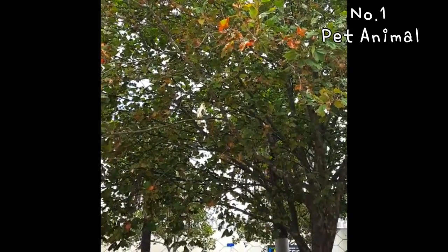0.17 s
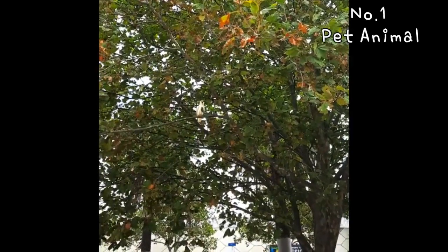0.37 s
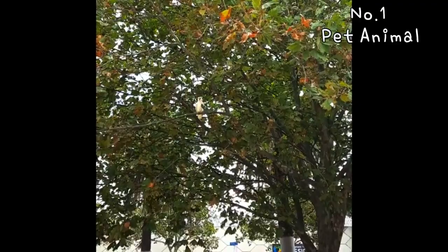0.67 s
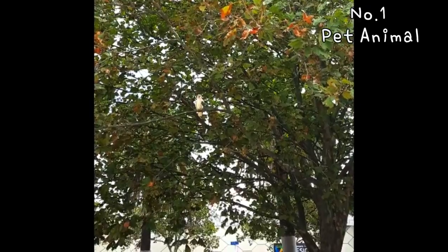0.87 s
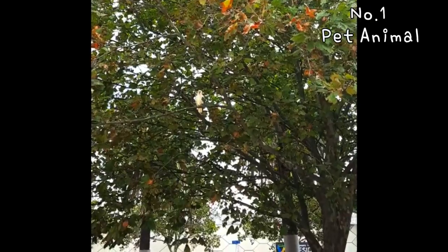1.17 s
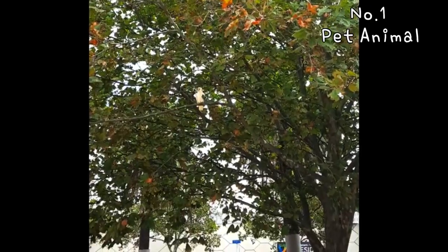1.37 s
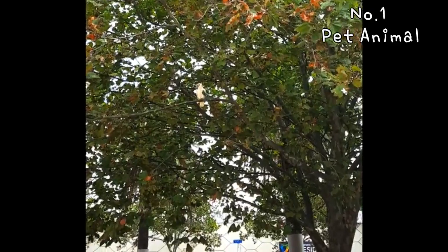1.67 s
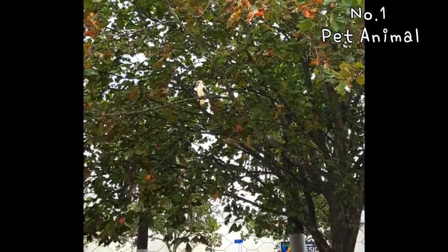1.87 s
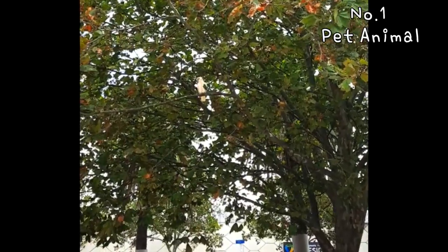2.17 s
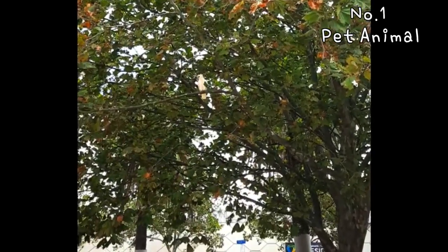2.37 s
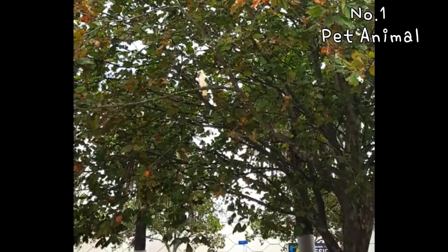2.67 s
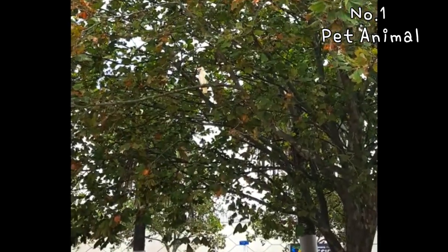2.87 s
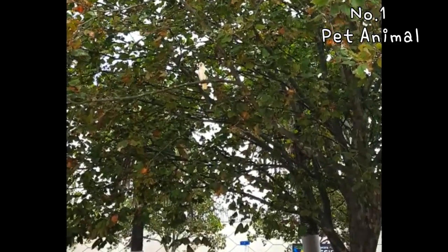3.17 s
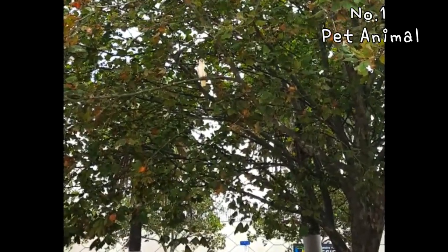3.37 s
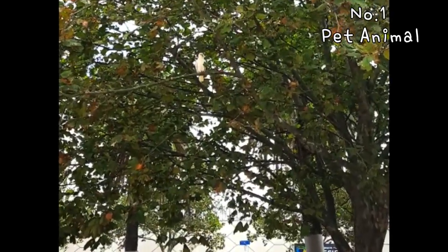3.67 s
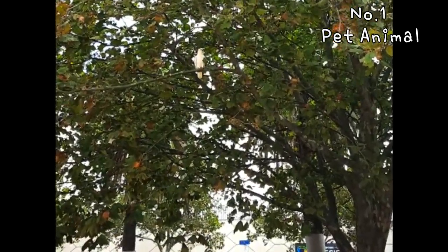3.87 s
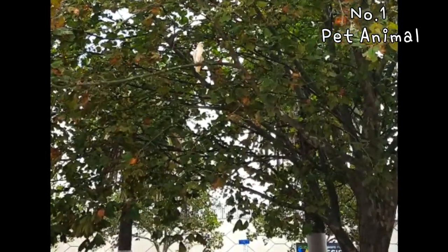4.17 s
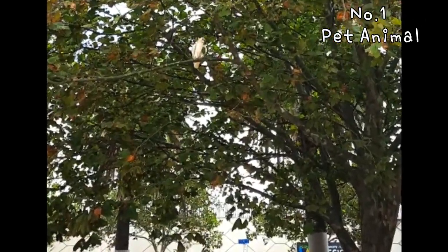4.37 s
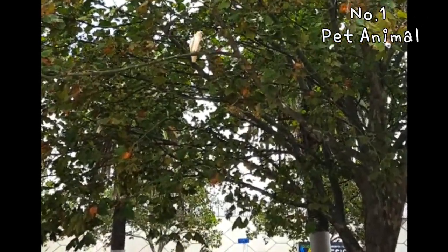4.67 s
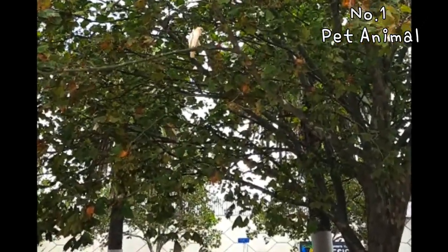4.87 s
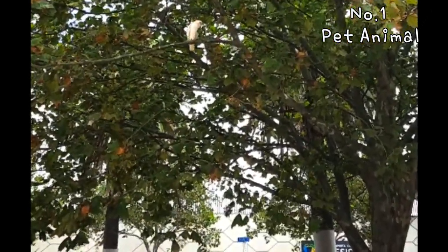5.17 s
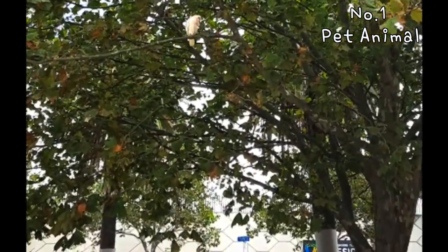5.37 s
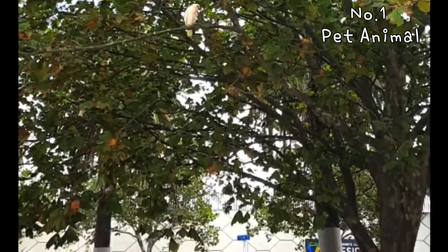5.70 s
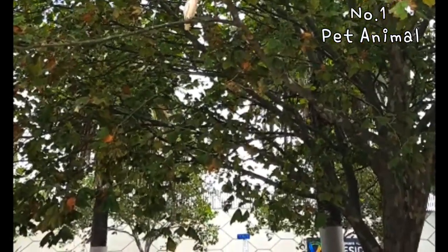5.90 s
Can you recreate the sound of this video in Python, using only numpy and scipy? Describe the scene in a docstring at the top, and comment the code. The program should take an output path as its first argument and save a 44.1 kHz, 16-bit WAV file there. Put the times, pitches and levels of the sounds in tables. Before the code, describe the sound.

The sound opens already inside a cockatoo's screech, lasting until about 0.6 s: loud, nasal and piercing, around 650 to 750 Hz with bright harmonics, roughening into a torn rasp in the middle and at its end. A short diffuse echo fades through the trees. Low, lumpy rumble continues throughout, heavier on the left, with dull soft bumps on the hand-held microphone, clustered in the first second and scattered until 4.8 s. Behind it lie a distant traffic wash and thin leaf hiss, with slight rustles near 1.9 and 3 s. From about 2.5 s a far engine drones faintly, rising in pitch. At 3.7 s the second screech begins with a brief high rough squeak, drops to a clearer note and fades, ending raspy at 4.3 s. A very faint brake squeal enters after 5.1 s; at 5.4 and 5.55 s a distant bird gives two short falling whistles.

```python
"""A cockatoo screeches twice in a park, each call breaking between a clear pitched tone and a chaotic rasp.
Pulses excite the throat resonances, and torn air supplies the rasp; leaves scatter the calls and a far wall
returns them. A distant bird whistles twice in gliding sines, and faint narrow rustles are bursts of noise.
An engine pulls away in three harmonics and a brake sings as one faint sine. Bumps on the hand-held
microphone are damped sines; rumble, traffic wash and leaf hiss are shaped noise."""
import sys
import numpy as np
from scipy import signal
from scipy.fft import rfft, irfft, next_fast_len
from scipy.io import wavfile
from scipy.ndimage import uniform_filter1d

SR = 44100
rng = np.random.default_rng(int(sys.argv[2]) if len(sys.argv) > 2 else 0)


def to_wav(s):
    """Save 16-bit WAV."""
    ch = np.atleast_2d(s).T  # columns
    pcm = np.round(np.clip(ch, -1, 1) * 32767)  # PCM
    wavfile.write(sys.argv[1], SR, pcm.astype(np.int16))


N = 266187
TIME = np.arange(N) / SR
PADDED = next_fast_len(N + 2 * SR, True)
FREQS = np.maximum(np.fft.rfftfreq(PADDED, 1 / SR), 1)

# The two screeches. Each row: start in seconds, end in seconds, level in dB before the band trims,
# hold in seconds, fade in dB per second, offset of the low partials in dB, offset of the treble in dB.
SCREECHES = [(-0.09, 0.569, -26.5, .17, 21, -1.5, -3), (3.671, 4.341, -27, 0.071, 14.5, -1, -4.5)]
ATTACK_S, RELEASE_S, RELEASE_DB = 0.13, 0.013, 7
# Pitch of each screech before droop and jitter. Each row: time in seconds, pitch in Hz.
SCREECH_PITCH = [
    [(0, 653.4), (.022, 668), (.036, 721.5), (.06, 755), (.2, 744), (.3, 715), (.338, 673.4), (.41, 641.3),
     (.47, 639.1), (.535, 650)],
    [(3.765, 634.2), (3.795, 636.8), (3.838, 697.5), (3.885, 687.9), (3.925, 711), (3.968, 701.6),
     (3.981, 663.6), (4.03, 653.2), (4.09, 637.7), (4.295, 630.8), (4.318, 658.3)],
]
# The pitch sags as each screech runs out.
DROOP_S, DROOP_HZ = 0.028, 68.4
# The second screech scoops up into a high register before it drops into its note.
SQUEAK_END_S, SQUEAK_HZ, SCOOP_S, SCOOP_HZ = 3.761, 1108, 0.035, 173
# The squeak leaves through a half-shut beak.
SQUEAK_RING_DB, SQUEAK_TREBLE_DB, BEAK_OPENS_S = -5, -10, 0.049
# The voice breaks into a rasp. Each row: start in seconds, end in seconds, roughness from 0 to 1.
VOICE_BREAKS = [(0.019, 0.038, .38), (0.102, 0.313, .75), (0.488, 0.58, .88), (3.657, 3.766, 0.9),
                (3.922, 3.947, .68), (3.959, 3.975, .58), (4.298, 4.321, .3), (4.321, 4.353, .88)]
# Between breaks the tone clears as the effort fades.
BREAK_EDGE_S, CLEAR_ROUGHNESS, ROUGHNESS_PER_DB = 0.0081, 0.19, 1.35
# Roughness 1 would move this much level out of the low partials and into the treble.
RASP_LOW_DB, RASP_TREBLE_DB = -0.5, 3
# Low, middle and treble bands each flare when a harmonic meets their resonance.
# Each row: centre in Hz, width in Hz, greatest lift in dB.
BAND_FLARES = [(2315, 248, 8), (3394, 190, 4), (6660, 96, 3.5)]
# The highest treble drops away as the second screech settles on its low note.
DULLS_AT_S, DULLS_OVER_S, DULLS_DB = 3.95, 0.07, -6.5
# Resonances of throat and open beak. Each row: centre in Hz, width of one pass in Hz, relative peak in dB.
THROAT_RESONANCES = [(763, 110, -18.5), (1251.6, 170, -6), (1423, 100, -4.5), (1780, 71, -11.5),
                     (2278, 475, 1.5), (2598, 180, -8), (3424, 160, -0.5), (4410, 210, -2.5),
                     (5080, 450, -6.5), (5980, 400, -9), (6450, 600, -4), (8330, 210, -19.5),
                     (10546, 1000, -25), (14000, 3500, -33)]
# An anti-resonance of the windpipe. The row: centre in Hz, width in Hz, depth in dB.
WINDPIPE_DIP = (3930, 270, -15)
SPREAD_S_PER_HZ = 2e-7
# Spectrum of the air torn by the syrinx. Each row: frequency in Hz, relative level in dB.
RASP_SPECTRUM = [(350, -63.5), (600, -39.5), (734, -26), (887, -26), (1350, -21), (1460, -22), (1910, -16),
                 (2220, -13.5), (2570, -16.5), (4970, -10.5), (5610, -20), (6510, -12), (9240, -40),
                 (10700, -28), (15000, -37)]
# Direction of the bird. Each row: frequency in Hz, left minus right level in dB.
BIRD_SIDE = [(700, 1), (2300, 0), (3400, -2.5), (4500, -4), (6500, -10), (8300, -8), (10500, 7),
             (15000, -14.5)]
# Distant whistles, one list a note. Each row: time in seconds, pitch in Hz before jitter, relative level in dB.
WHISTLES = [
    [(5.415, 1693, -73.5), (5.44, 1634, -50.5), (5.465, 1492, -59), (5.5, 1496, -55)],
    [(5.545, 1530, -60.5), (5.572, 1504, -46.5), (5.59, 1390, -59), (5.607, 1180, -56)],
]
# Faint narrow rustles. Each row: centre time in seconds, half length in seconds, centre in Hz, level in dB.
NARROW_RUSTLES = [(0.968, 0.034, 6370, -68.5), (2.96, .03, 3500, -65), (5.612, 0.05, 4200, -69),
                  (5.91, .06, 3850, -67.5)]
# Firing rate of the far engine before jitter. Each row: time in seconds, rate in Hz.
ENGINE_RATE = [(2.3, 71), (3.05, 74.1), (3.85, 79.94), (4.85, 88.06), (6.04, 87.07)]
# Its drone swells and sinks. Each row: centre time in seconds, half length in seconds, relative level in dB.
ENGINE_SWELLS = [(2.52, 0.091, -35), (3.02, 0.16, -37.5), (3.9, 0.22, -35.5), (4.77, 0.28, -36),
                 (5.87, .22, -39)]
BRAKE_HZ = 2000
# Level of the brake before its flutter. Each row: time in seconds, level in dB.
BRAKE_LEVEL = [(5.08, -93), (5.22, -68), (5.42, -68.5), (5.56, -70.5), (5.68, -72)]
# Bumps on the microphone. Each row: start in seconds, relative level in dB, pitch of the body in Hz,
# relative level in dB of the shudder it adds to the rumble.
MICROPHONE_BUMPS = [(0.087, -17, 108, -55), (0.115, -12, 77.4, -48), (0.165, -17, 110, -52),
                    (0.312, -15, 107, -45), (0.589, -22, 116, -39), (0.698, -21.5, 125, -46),
                    (0.736, -22, 119, -35), (0.893, -24.5, 123, -42), (1.832, -16.5, 84, -53),
                    (2.108, -24.5, 130, -50), (2.442, -21.5, 75, -43), (2.511, -23.5, 135, -43),
                    (2.647, -26, 140, -47.5), (2.946, -29, 85, -37), (3.102, -24.5, 73.5, -45.5),
                    (3.526, -15.5, 138.1, -39), (3.814, -17.5, 102, -48), (4.614, -19.5, 94, -37.5),
                    (4.659, -25.5, 79, -40), (4.825, -19, 89.2, -47.5)]
# Each bump stirs up the rumble for a moment.
SHUDDER_LAG_S, SHUDDER_S = 0.012, 0.021
# Spectrum of the rumble. Each row: frequency in Hz, relative level in dB.
RUMBLE_SPECTRUM = [(15, -49), (25, -23), (59, -5.5), (75, 0.5), (103, -6), (124, -5), (203, -16.5),
                   (227, -19), (254, -22.5), (299, -15.5), (500, -36.5), (650, -67), (1100, -120)]
# Course of the rumble. Each row: time in seconds, relative level in dB.
RUMBLE_LEVEL = [(0, -43.5), (1.3, -45.5), (2.3, -44), (3.3, -44.5), (4.7, -44.5), (5.3, -48.5),
                (6.04, -44.5)]
# Spectrum of the traffic wash. Each row: frequency in Hz, relative level in dB.
TRAFFIC_SPECTRUM = [(250, -6), (450, -4.5), (700, -4.5), (1000, -9), (1500, -16), (2200, -21.5),
                    (3500, -28.5), (7000, -42)]
# Course of the traffic wash. Each row: time in seconds, level in dB before panning.
TRAFFIC_LEVEL = [(0, -53.5), (1.2, -59), (2, -55.5), (3, -55), (4.5, -55), (6.04, -53.5)]
# Spectrum of the leaf hiss. Each row: frequency in Hz, relative level in dB.
LEAF_SPECTRUM = [(1500, 0), (3000, -2.5), (4500, 0.5), (6000, 4), (8000, -1), (9500, -14.5), (12000, -10),
                 (15000, -9)]
# Course of the leaf hiss. Each row: time in seconds, level in dB before panning.
LEAF_LEVEL = [(0, -74), (1.35, -73.5), (2.0, -69.5), (2.9, -68), (4.85, -70), (5.3, -71.5), (5.65, -67.5)]
# Brief rustles. Each row: centre time in seconds, half length in seconds, level in dB before panning.
LEAF_RUSTLES = [(1.87, .04, -67), (2.98, 0.055, -66)]
CUTOFF_HZ = 15350


def cockatoo(low_db=-0.5, mid_db=-1.5, high_db=0.0, sizzle_db=2.0):
    """Radiation from the beak: effort sets the level of three bands, each with its own course."""
    pitch, rough, low_course_db, ring_course_db, treble_course_db = gestures()
    voice = through_crown(syrinx(pitch, rough))
    side = panned(curve_db(BIRD_SIDE))
    over_low, over_mid, over_top = above(2420), above(3900), above(8500)
    body = evened(filtered(voice, side * (1 - over_low))) * from_db(low_course_db + low_db)
    ring = evened(filtered(voice, side * (over_low - over_mid))) * from_db(ring_course_db + mid_db)
    treble = evened(filtered(voice, side * over_mid)) * from_db(treble_course_db + high_db)
    # the highest treble is lifted, then dulled within the second screech
    sizzle_gain = from_db(sizzle_db + DULLS_DB * ramp(DULLS_AT_S, DULLS_OVER_S))
    treble = treble + filtered(treble, over_top) * (sizzle_gain - 1)
    gate = sum(sounding([[start], [end]]) for start, end, *_ in SCREECHES)
    return (body + ring + treble) * gate


def gestures():
    """Vocal effort: each screech swells, holds and fades; gives pitch, roughness and three band levels in dB."""
    half_edge = BREAK_EDGE_S / 2
    broken = 0
    for start, end, rough in VOICE_BREAKS:
        broken = broken + rough * (ramp(start - half_edge, BREAK_EDGE_S) - ramp(end - half_edge, BREAK_EDGE_S))
    calls = []
    for (start, end, db, hold, fade, low_db, treble_db), tune in zip(SCREECHES, SCREECH_PITCH):
        attack_db = 20 * np.log10(ramp(start, ATTACK_S) + 1e-4)
        faded_db = fade * np.maximum(TIME - start - ATTACK_S - hold, 0)
        effort_db = db + attack_db - faded_db - RELEASE_DB * ramp(end - RELEASE_S, RELEASE_S)
        pitch = in_time(tune)[0] - DROOP_HZ * ramp(end - DROOP_S, DROOP_S)
        rough = np.clip(np.maximum(broken, CLEAR_ROUGHNESS - ROUGHNESS_PER_DB * faded_db), 0, 1)
        calls.append([pitch, rough, effort_db + low_db, effort_db, effort_db + treble_db])
    second_start = SCREECHES[1][0]
    in_second = TIME > second_start - 1
    pitch, rough, low, ring, treble = np.where(in_second, calls[1], calls[0])
    squeak = SQUEAK_HZ - SCOOP_HZ * (1 - ramp(second_start, SCOOP_S))
    pitch = np.where(in_second & (TIME < SQUEAK_END_S), squeak, pitch)
    shut = in_second * (1 - ramp(SQUEAK_END_S, BEAK_OPENS_S))
    flares = []
    for hz, width, db in BAND_FLARES:
        nearest_harmonic = np.round(hz / pitch) * pitch
        flares.append(db * np.exp(-((nearest_harmonic - hz) / width) ** 2))
    low_flare, ring_flare, treble_flare = flares
    # a rasp smears the upper harmonics, so the upper flares shrink as roughness grows
    clear = 1 - rough
    low = low + low_flare + RASP_LOW_DB * rough
    ring = ring + ring_flare * clear + SQUEAK_RING_DB * shut
    treble = treble + treble_flare * clear + RASP_TREBLE_DB * rough + SQUEAK_TREBLE_DB * shut
    return pitch, rough, low, ring, treble


def syrinx(pitch, rough, slip=0.047, waver=0.0013, shimmer_db=-0.5, doubling=0.6, rasp_db=0.0, burst_db=4.5):
    """Source and filter: pulses ring the throat; roughness makes cycles slip and sputter and tears the air."""
    chaos = rough * np.sqrt(rough)
    phase = np.cumsum(pitch * (1 + waver * drift(90) + 0.012 * chaos * drift(160))) / SR
    # uneven cycle timing smears the high harmonics first
    phase = phase + slip * chaos * drift(650)
    # in fits, strong and weak cycles alternate
    alternation = 1 + doubling * chaos * drift(60) * np.cos(np.pi * phase)
    strength = from_db(shimmer_db * chaos * drift(500)) * alternation
    tone = evened(filtered(pulses(phase) * strength, throat_response())[None])[0]
    # the tone weakens and sputters, and air escapes in puffs once a cycle
    tone = tone * np.sqrt(1 - 0.85 * chaos ** 2)
    tone = tone * from_db(burst_db * chaos * drift(220))
    puffs = rng.standard_normal(N) * (1 + 0.5 * np.cos(2 * np.pi * phase)) * from_db(2 * drift(180))
    torn_air = rms_one(filtered(puffs, from_db(curve_db(RASP_SPECTRUM))))
    return tone + from_db(rasp_db) * chaos * torn_air


def pulses(phase, count=27):
    """Fourier synthesis: equal harmonics add up to one sharp pulse a cycle."""
    half = np.pi * (phase % 1) + 1e-9
    return rms_one(np.sin((2 * count + 1) * half) / np.sin(half) - 1)


def throat_response():
    """Resonance and dispersion: throat and beak form peaks, the windpipe a dip and a spread in time."""
    # each resonance acts twice, which keeps the valleys between them dark
    peaks = sum(from_db(db) / (1 + 2j * (FREQS - hz) / width) ** 2 for hz, width, db in THROAT_RESONANCES)
    dip_hz, dip_width, dip_db = WINDPIPE_DIP
    dip = from_db(dip_db * np.exp(-(2 * (FREQS - dip_hz) / dip_width) ** 2))
    # higher harmonics leave a little later
    spread = np.exp(-1j * np.pi * FREQS ** 2 * SPREAD_S_PER_HZ)
    return peaks * dip * spread


def through_crown(voice, branches_db=-1.5, flutter_db=-12.5, left_lag_ms=0.07):
    """Scattering: direct sound, quick reflections from branches, and shifting ones from swaying leaves."""
    branches, leaves = scatter(0.02, 0.0005), scatter(0.02, 0.0005)
    still = filtered(voice, left_late(left_lag_ms) + from_db(branches_db) * branches)
    return still + from_db(flutter_db) * drift(14) * filtered(voice, leaves)


def park_echoes(x, trees_db=-8.0, trees_t60=0.4, tail_db=-23.0, tail_t60=1.294,
                wall_s=0.25, wall_db=-31.0, dull_hz=4300):
    """Reverberation: other trees, a long thin tail and a far wall return sound dulled by air and foliage."""
    trees = from_db(trees_db) * scatter(trees_t60, 0.018)
    tail = from_db(tail_db) * scatter(tail_t60, 0.05)
    wall = from_db(wall_db) * np.exp(-2j * np.pi * FREQS * wall_s)
    return filtered(x, (trees + tail + wall) / np.sqrt(1 + (FREQS / dull_hz) ** 4))


def scatter(t60, first_s):
    """Diffuse reflection: response of random, dying arrivals, different in each channel; unit energy."""
    burst = rng.standard_normal((2, N)) * from_db(-60 * np.minimum(TIME / t60, 4)) * (TIME > first_s)
    return rfft(burst / np.sqrt(np.sum(burst ** 2, axis=1, keepdims=True)), PADDED)


def far_bird(octave_db=-10.5):
    """Gliding tones: two whistles fall in pitch, each a sine with its octave."""
    out = 0
    for note in WHISTLES:
        pitch, level_db = in_time(note)
        phase = 2 * np.pi * np.cumsum(pitch * (1 + 0.00644 * drift(200))) / SR
        tone = np.sin(phase) + from_db(octave_db) * np.sin(2 * phase)
        out = out + tone * from_db(level_db) * sounding(note)
    return np.sqrt(2) * out


def narrow_rustles(width_hz=600):
    """Band-limited noise: short soft bursts of narrow-band noise."""
    out = 0
    for s, length, hz, db in NARROW_RUSTLES:
        band = np.exp(-(2 * (FREQS - hz) / width_hz) ** 2)
        noise = rms_one(filtered(rng.standard_normal((2, N)), band))
        out = out + noise * from_db(db) * np.exp(-((TIME - s) / length) ** 2)
    return out


def engine(second_db=-16.5, third_db=-20.5):
    """Periodic exhaust: the firing rate and two overtones climb as a vehicle gathers speed, then level off."""
    rate, = in_time(ENGINE_RATE)
    phase = 2 * np.pi * np.cumsum(rate * (1 + 0.0081 * drift(15))) / SR
    note = np.sin(phase) + from_db(second_db) * np.sin(2 * phase) + from_db(third_db) * np.sin(3 * phase)
    throb = from_db(1.2 * drift(12))
    return np.sqrt(2 * swells(ENGINE_SWELLS)) * note * throb * panned(1.4)


def brake():
    """A single partial: a thin squeal from the street, slightly unsteady in pitch and level."""
    phase = 2 * np.pi * np.cumsum(BRAKE_HZ * (1 + 0.00202 * drift(60))) / SR
    level = from_db(in_time(BRAKE_LEVEL)[0] + 1.9 * drift(25))
    return np.sqrt(2) * np.sin(phase) * level * sounding(BRAKE_LEVEL)


def bumps(t60=0.028, gain_db=0.5, rise_s=0.0043):
    """Damped oscillation: each bump is a few dull, quickly dying cycles, mostly on the left."""
    out = np.zeros(N)
    for s, db, hz, _ in MICROPHONE_BUMPS:
        age = np.clip(TIME - s, 0, 1)
        decay = from_db(db + gain_db - 60 * age / t60)
        out += decay * 2 * (1 - np.exp(-age / rise_s)) * np.sin(2 * np.pi * hz * age)
    return out * np.array([[1.85], [0.15]])


def background(rumble_db=4.5, lump_db=2.0):
    """Shaped noise: lumpy low rumble, the wash of far tyres and a faint hiss of leaves."""
    shudders = swells([(s + SHUDDER_LAG_S, SHUDDER_S, db) for s, _, _, db in MICROPHONE_BUMPS])
    heave = np.sqrt(from_db(in_time(RUMBLE_LEVEL)[0]) ** 2 + shudders)
    rumble = stereo_noise(RUMBLE_SPECTRUM, likeness=0.79, left_db=6.0) * heave
    rumble = rumble * from_db(rumble_db + lump_db * drift(25))
    tyres = stereo_noise(TRAFFIC_SPECTRUM, likeness=0.45, left_db=1.5) * from_db(in_time(TRAFFIC_LEVEL)[0])
    leaf_gain = np.sqrt(from_db(in_time(LEAF_LEVEL)[0]) ** 2 + swells(LEAF_RUSTLES))
    leaves = stereo_noise(LEAF_SPECTRUM, likeness=0.0, left_db=-5.0) * leaf_gain
    return rumble + tyres + leaves


def stereo_noise(spectrum, likeness, left_db, left_lag_ms=0.14):
    """Partial coherence: coloured noise shared in part by both channels, its left side delayed."""
    mid, side = rng.standard_normal((2, N))
    c = np.clip(likeness, 0, 1)
    pair = np.sqrt(1 + c) * mid + np.sqrt(1 - c) * side * [[1], [-1]]
    response = from_db(curve_db(spectrum)) * left_late(left_lag_ms)
    return rms_one(filtered(pair, response)) * panned(left_db)


def from_db(db):
    """Logarithmic level: decibels to amplitude gain."""
    return 10 ** (np.asarray(db) / 20)


def rms_one(x):
    """Normalization: scale to unit mean power."""
    return x / np.sqrt(np.mean(x ** 2) + 1e-20)


def evened(pair, window=0.022):
    """Level control: hold the short-term level of the centre near one; window in seconds."""
    power = uniform_filter1d(pair.mean(0) ** 2, int(window * SR))
    return pair / np.sqrt(np.maximum(power, 0) + 1e-4 * np.mean(pair ** 2))


def in_time(rows):
    """Linear interpolation: each column of a curve at every sample."""
    s, *columns = np.transpose(rows)
    return [np.interp(TIME, s, c) for c in columns]


def sounding(rows, edge=0.003):
    """Gating: one between the first and last row, with soft edges in seconds outside them."""
    return np.clip(np.minimum(TIME - rows[0][0], rows[-1][0] - TIME) / edge + 1, 0, 1)


def ramp(start, length):
    """Linear transition: rises from zero to one over length seconds."""
    return np.clip((TIME - start) / length, 0, 1)


def swells(rows):
    """Addition of powers: bell-shaped swells summed as energy."""
    power = 0
    for s, length, db in rows:
        power = power + from_db(db) ** 2 * np.exp(-np.minimum(((TIME - s) / length) ** 2, 60))
    return power


def drift(rate):
    """Random modulation: smooth chance of unit RMS that changes about rate times a second."""
    steps = rng.standard_normal(N // 8)
    return rms_one(np.interp(TIME * rate, np.arange(len(steps)), steps))


def curve_db(points):
    """Spectral interpolation: a short spectrum on the whole logarithmic frequency axis."""
    hz, db = np.transpose(points)
    return np.interp(np.log(FREQS), np.log(hz), db)


def filtered(x, response):
    """Linear filtering: multiply the spectrum of a sound by a frequency response."""
    return irfft(rfft(x, PADDED) * response, PADDED)[..., :N]


def above(hz):
    """Steep crossover: the share of each frequency that lies above hz."""
    return 1 / (1 + (hz / FREQS) ** 24)


def panned(left_db):
    """Interaural level difference: gains of the two channels."""
    return from_db(np.array([[0.5], [-0.5]]) * left_db)


def left_late(ms):
    """Interaural time difference: frequency response that delays the left channel."""
    return np.exp(-2j * np.pi * FREQS * np.array([[ms], [0]]) / 1000)


def scene(far_direct_db=-1.5, far_echo_db=4.0):
    """Superposition: birds and echoes over the street; the far bird has more echo and less direct sound."""
    near, far = cockatoo(), far_bird()
    echoes = park_echoes(near + from_db(far_echo_db) * far)
    birds = near + from_db(far_direct_db) * far + echoes
    return birds + narrow_rustles() + background() + engine() + brake() + bumps()


def record(dry, low_cut_hz=42):
    """Band limiting: the small microphone loses the deep bass, and the top is cut steeply."""
    thin = signal.sosfilt(signal.butter(3, low_cut_hz, "high", fs=SR, output="sos"), dry)
    return signal.sosfilt(signal.ellip(12, 0.1, 90, CUTOFF_HZ, fs=SR, output="sos"), thin)


dry = scene()
out = record(dry)
to_wav(out)
```